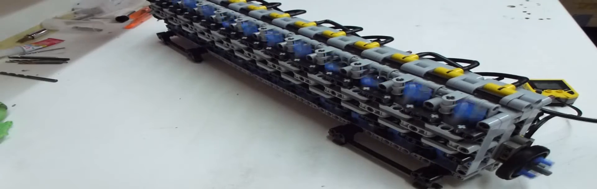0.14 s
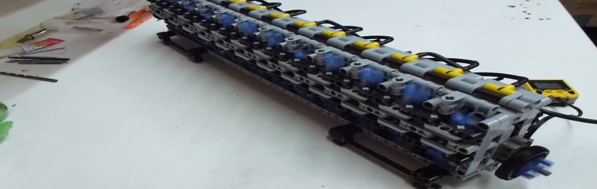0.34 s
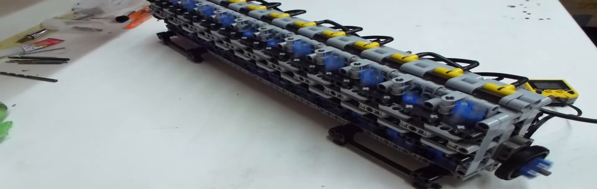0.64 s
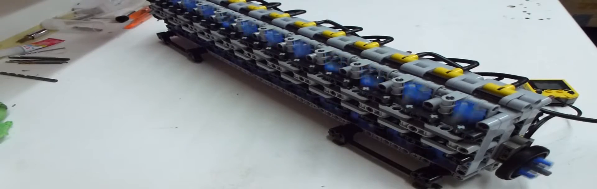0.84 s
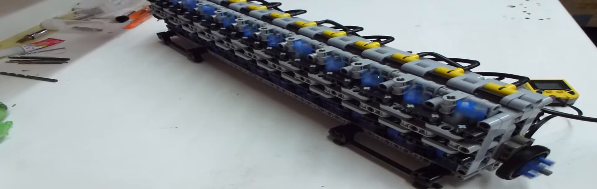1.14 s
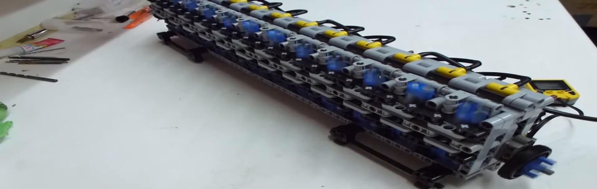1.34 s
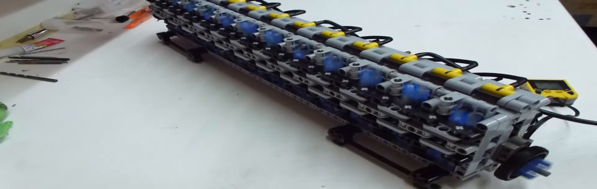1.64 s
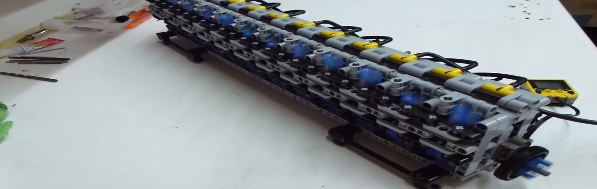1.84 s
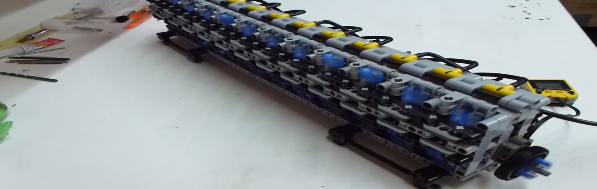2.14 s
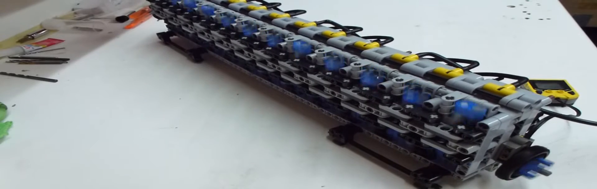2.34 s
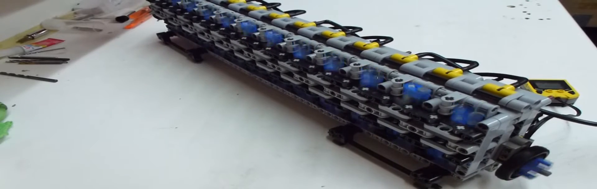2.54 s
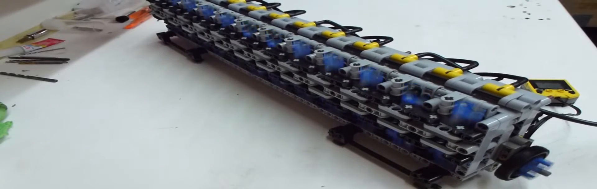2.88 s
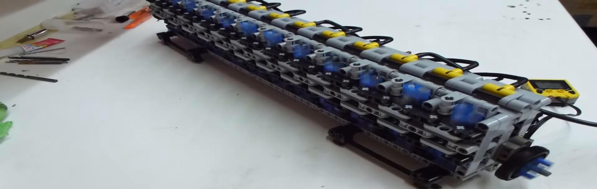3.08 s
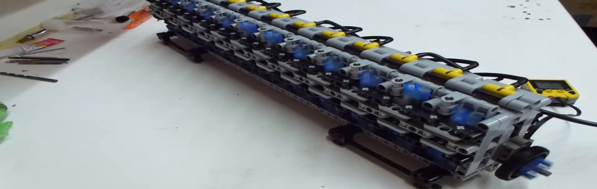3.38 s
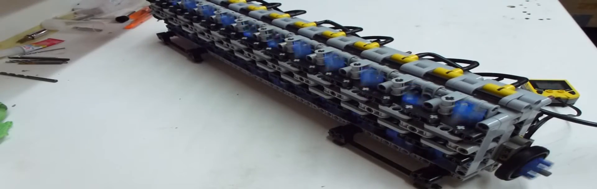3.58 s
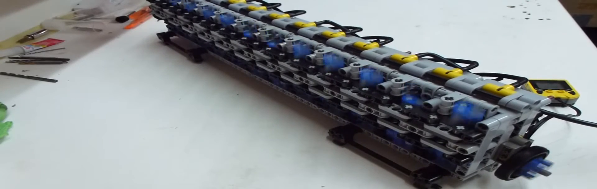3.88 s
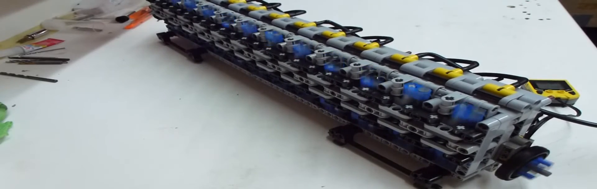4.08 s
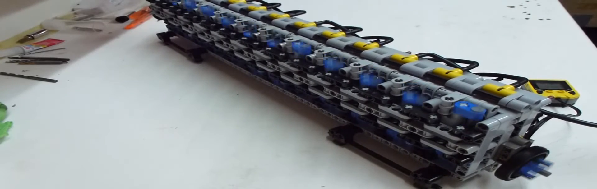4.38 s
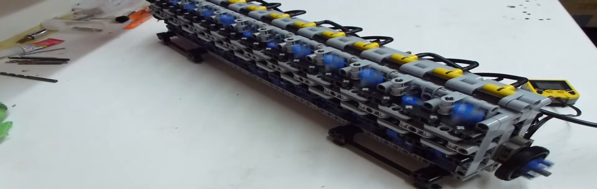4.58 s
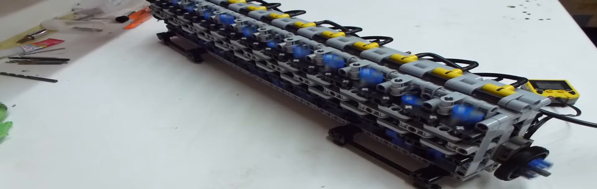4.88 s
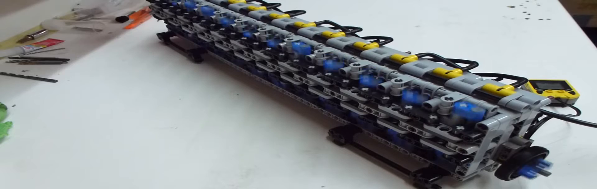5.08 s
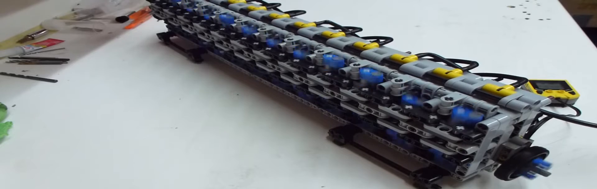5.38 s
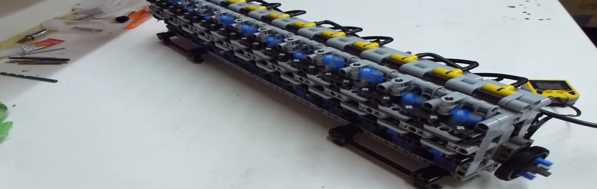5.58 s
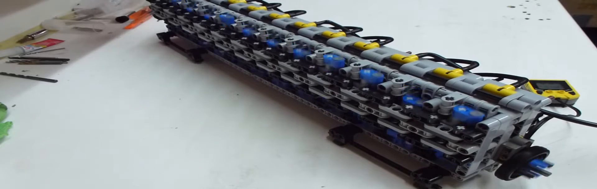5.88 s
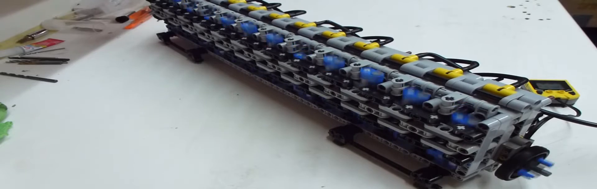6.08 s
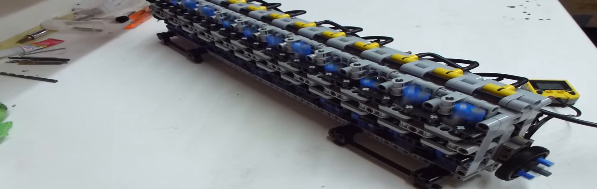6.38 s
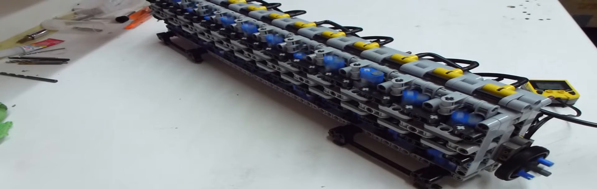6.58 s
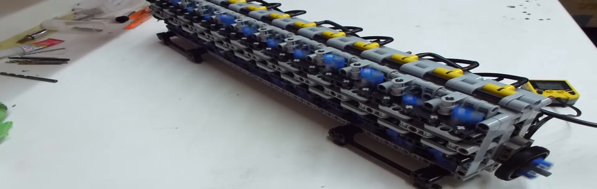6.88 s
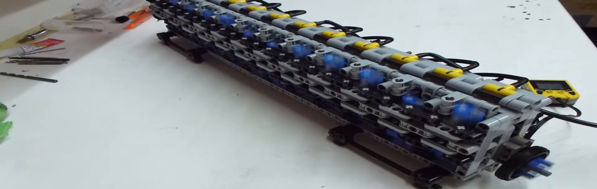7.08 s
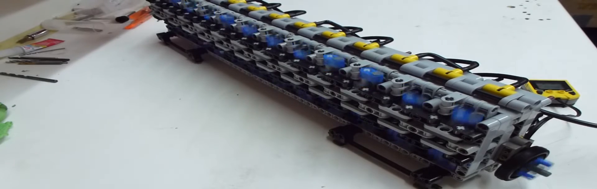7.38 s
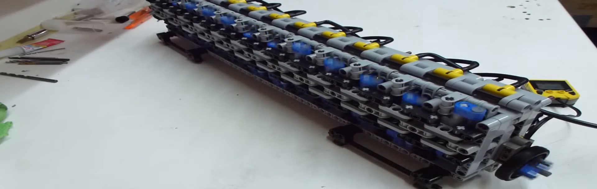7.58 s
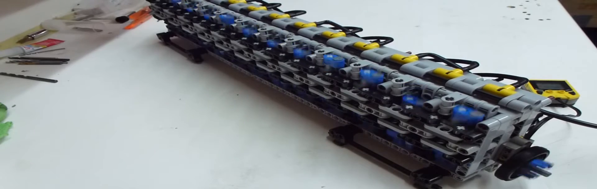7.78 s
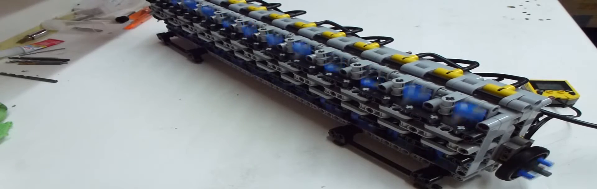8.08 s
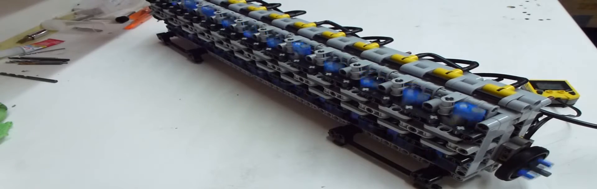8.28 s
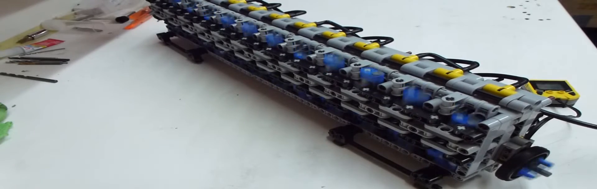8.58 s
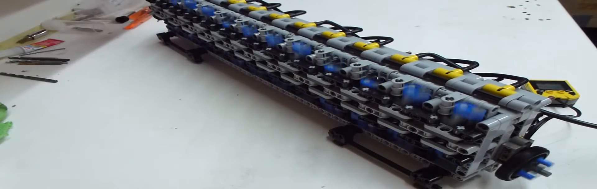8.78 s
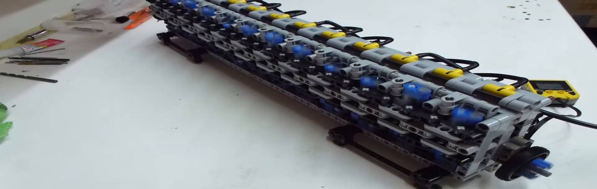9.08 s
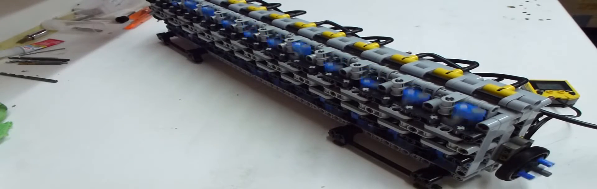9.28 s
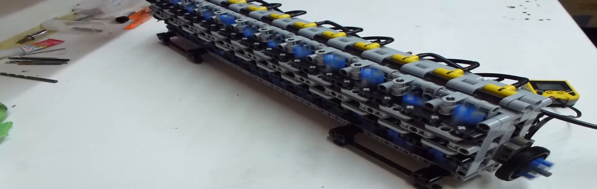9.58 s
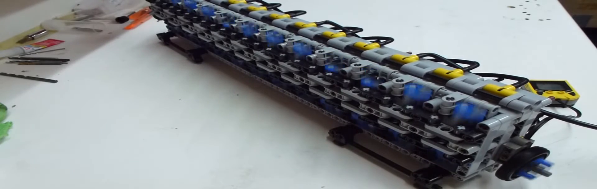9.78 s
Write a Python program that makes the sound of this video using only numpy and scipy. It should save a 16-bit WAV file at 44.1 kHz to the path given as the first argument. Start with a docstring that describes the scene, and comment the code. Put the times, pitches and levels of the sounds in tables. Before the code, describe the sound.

A many-cylinder toy engine of plastic bricks runs on compressed air, with bright hiss, fast rattling and a pulsing buzz. It drops out twice for an instant, then holds an even hum. It slows almost to rest, with separate puffs and clacks, and is then revved in five surges that shake the table. The stereo microphone is close, in a quiet room.

```python
"""Puffing, rattling and a pulsing buzz: a long many-cylinder toy engine of plastic bricks runs on
compressed air, on a table in a quiet room, close to a stereo microphone. It stalls twice briefly,
runs evenly, slows almost to rest and is then revved in surges. Each turn of the crank shakes frame
and table in the same pattern; the valves puff air and loose links rattle. At speed the links pull
tight and the shaking becomes a clean hum. The bass sits in the centre, the hiss spreads wide."""
import sys
import numpy as np
from scipy import signal
from scipy.fft import rfft, irfft, next_fast_len
from scipy.io import wavfile
from scipy.ndimage import uniform_filter1d

SR = 44100
rng = np.random.default_rng(int(sys.argv[2]) if len(sys.argv) > 2 else 0)


def put_to_file(sound):
    """Save the sound as 16-bit audio at rate SR, in the file named by the first command-line argument."""
    columns = np.atleast_2d(sound).T  # one column per channel
    safe = np.clip(columns, -1, 1)
    whole_steps = np.round(safe * 32767)
    wavfile.write(sys.argv[1], SR, whole_steps.astype(np.int16))


N = 438354
T = np.arange(N) / SR

# Colour of plastic parts knocking together. Each row: frequency in Hz, gain in dB.
PLASTIC_COLOUR = [(40, -26), (200, -20), (600, -24), (900, -18), (1200, -14.5), (1800, -13), (2300, -5.7),
                  (3000, -1), (4200, 0.5), (5100, -3), (6400, -2), (9000, -5), (12500, -7), (16000, -22)]


def undb(db):
    """Decibels to gain."""
    return 10 ** (np.asarray(db) / 20)


def unit(x):
    """Scale to rms 1."""
    return x / np.sqrt(np.mean(x ** 2))


def ramp(start_s, length_s):
    """Rises from 0 to 1 over the given time."""
    return np.clip((T - start_s) / length_s, 0, 1)


def since(start_s):
    """Seconds gone by since a moment, 0 before it."""
    return np.maximum(T - start_s, 0)


def band(x, order, hz, kind):
    """The low or high part of a signal, with no phase shift."""
    return signal.sosfiltfilt(signal.butter(order, hz, kind, fs=SR, output="sos"), x)


def colour(x, points):
    """Causal filter with the gain of (Hz, dB) points."""
    size = next_fast_len(2 * N)
    hz, db = np.transpose(points)
    bin_hz = np.maximum(np.arange(size // 2 + 1) * SR / size, 1)
    gain = undb(np.interp(np.log(bin_hz), np.log(hz), db))
    cepstrum = irfft(np.log(gain), size)
    cepstrum[1:size // 2] *= 2  # folded over for minimum phase
    cepstrum[size // 2 + 1:] = 0
    return irfft(rfft(x, size) * np.exp(rfft(cepstrum)), size)[..., :N]


def ring(x, modes):
    """A bank of (Hz, width in Hz, dB) resonances."""
    return sum(undb(db) * signal.lfilter(*signal.iirpeak(hz, hz / width, SR), x)
               for hz, width, db in modes)


def fade(x, seconds):
    """Give every impulse an exponential tail."""
    return signal.lfilter([1], [1, -np.exp(-1 / (seconds * SR))], x)


def impulses(times, sizes):
    """Single-sample blows at the given times; those past the end are dropped."""
    return np.bincount(np.clip(np.asarray(times) * SR, 0, N).astype(int), sizes, N + 1)[:N]


def mid_side(vibration):
    """Side is a quarter cycle behind mid, so left and right hear one vibration out of step."""
    return np.array([vibration, signal.hilbert(vibration, next_fast_len(N))[:N].imag])


def free_play(speed_hz):
    """Play in the links: large at low speed, taken up when the engine runs fast."""
    return np.interp(speed_hz, [8, 12, 16, 17.3], [1.6, 1.05, .6, .02])


def crank_load(turns, dip, swell, peak_turn):
    """Once a turn the load swells smoothly, and lets go briefly at the crank's slack spot."""
    release = 1 - dip * abs(np.cos(np.pi * turns)) ** 18
    return release * (1 + swell * np.cos(2 * np.pi * (turns - peak_turn)))


def strokes(turns, count, pattern_db, scatter_db, slop):
    """So many blows a turn, each with its own angle and strength, straying by slop and scatter."""
    angle, strength = rng.random(count), rng.standard_normal(count)
    late, harder = rng.standard_normal((200, count, 2)).transpose(2, 0, 1)  # enough for 200 turns
    at_turn = np.arange(len(late))[:, None] + (np.arange(count) + angle) / count
    speed_hz = np.interp(at_turn, turns, np.gradient(turns) * SR)
    at_turn = at_turn + slop * late * free_play(speed_hz)
    times = np.interp(at_turn.ravel(), turns, T, left=2 * T[-1], right=2 * T[-1])
    sizes = undb(pattern_db * strength + scatter_db * np.clip(harder, -2, 2))
    return impulses(times, sizes.ravel())


def cycle(turns, orders_db, one_turn, passes):
    """The same shake every turn: like-sized strokes at random angles, clear of the slack spot."""
    crank = np.arange(len(one_turn)) / len(one_turn)
    gains = np.concatenate([[0, 0], undb(orders_db)])  # from twice the crank speed upward
    load = crank_load(crank, dip=.7, swell=.1, peak_turn=.4)
    for _ in range(passes):  # even out the strokes, then restore the spectrum
        evened = np.tanh(2 * unit(one_turn)) * load
        phases = np.angle(rfft(evened)[:len(gains)])
        one_turn = irfft(gains * np.exp(1j * phases), len(crank))
    return np.interp(turns, crank, unit(one_turn) * np.linalg.norm(gains), period=1)


def tick(ring_s, snap, tail_db=-22, tail_s=0.016):
    """One plastic part struck: a snap, a dense short ring and a faint room tail, as mid and side."""
    t = T[:SR // 12]
    envelope = np.exp(-t / ring_s) + undb(tail_db) * np.exp(-t / tail_s)
    sound = rng.standard_normal((2, len(t))) * envelope
    sound[0, 0] += snap
    return sound


def room_tone():
    """The quiet room behind the engine: a faint, steady rumble and hiss."""
    # Each row: frequency in Hz, gain in dB.
    room_colour = [(25, -40), (60, 1), (130, 6), (300, -7), (1000, -14), (5000, -7), (16000, -22)]
    return undb(-56.5) * unit(colour(rng.standard_normal((2, N)), room_colour))


def table_bump(start_s=1.56, length_s=0.018, level_db=-37.5):
    """One soft, scuffing contact rings the table top, one resonance after another."""
    # Each row: resonance in Hz, width in Hz, relative level in dB, lag in seconds.
    table_modes = [(400, 80, -3, 0), (497, 25, 0, 0.022), (775, 35, -4, 0.004)]
    out = 0
    for hz, width, db, lag_s in table_modes:
        mode = unit(ring(rng.standard_normal((2, N)), [(hz, width, 0)]))
        envelope = np.exp(-((T - start_s - lag_s) / length_s - 1) ** 2)
        out = out + undb(level_db + db) * mode * envelope
    return out


def link_clacks(gain_db=4.5):
    """Now and then a link snaps across its play with a sharp clack."""
    # Each row: start in seconds, relative level in dB.
    snaps = [(0.7, -9), (0.7524, -16), (0.9133, -19), (1.9445, -12), (3.556, -12), (5.121, -15),
             (5.234, -14), (5.349, -9), (5.414, -12), (5.996, -17), (6.304, -8), (6.4144, -10),
             (6.8186, -17), (9.7757, -13)]
    out = np.zeros((2, 2 * N))
    for start_s, db in snaps:
        sound, start = tick(ring_s=0.0032, snap=2.4), int(start_s * SR)
        out[:, start:start + sound.shape[1]] += undb(db + gain_db) * sound / abs(sound).max()
    return colour(out[:, :N], PLASTIC_COLOUR)


def rattle(turns, level_db, parts=8):
    """Loose rods and valve levers knock three times a turn, each with a ring of its own."""
    out = 0
    for _ in range(parts):
        blows = strokes(turns, count=3, pattern_db=4.5, scatter_db=0, slop=.012)
        out = out + signal.oaconvolve(blows[None], tick(ring_s=0.013, snap=8.4), axes=1)[:, :N]
    return unit(colour(out, PLASTIC_COLOUR)) * undb(level_db)


def exhaust(turns, speed_hz, level_db, leak_share=0.55, puff_s=0.0039):
    """Valves let out short puffs over a steady leak; near standstill they are heard one by one."""
    # Colour of the escaping air. Each row: frequency in Hz, gain in dB.
    air_colour = [(150, -22.5), (600, -17), (1100, -14.5), (1800, -15), (2300, -14.5), (3100, -7.5),
                  (4200, -3.5), (5100, -5), (6400, -3), (7500, -6), (9000, -6.5), (10500, -9),
                  (12300, -8.5), (14500, -10.5), (16000, -29)]
    # Single valves venting. Each row: start in seconds, relative level in dB, decay in seconds.
    lone_vents = [(5.7716, -27.5, 0.014), (5.8423, -31.5, 0.02), (5.909, -26, 0.004),
                  (5.9448, -26.5, 0.003), (5.9648, -27, 0.008)]
    openings = strokes(turns, count=22, pattern_db=6, scatter_db=4.5, slop=0.0052)
    puffs = fade(openings, puff_s) + 1e-9
    puffs = abs(puffs / uniform_filter1d(puffs, size=SR // 6))
    flow = undb(level_db) * np.sqrt(leak_share + (1 - leak_share) * puffs)
    vents = sum(fade(impulses([s], [undb(db)]), decay_s) for s, db, decay_s in lone_vents)
    air = unit(colour(rng.standard_normal((2, N)), air_colour)) * np.hypot(flow, vents)
    # Fast puffs are thin and bright, slow ones have more body; at a crawl the valve ports ring out.
    octaves = np.log2(speed_hz / 11.5)
    top_change = band(air, 3, 12800, "high") * (undb(3 * octaves) - 1)
    body_change = band(air, 2, 1300, "low") * (undb(-0.5 * octaves) - 1)
    ports = ring(air, [(4300, 550, -10)]) * np.clip(-octaves, 0, 1)
    return air + ports + top_change + body_change


def piston_force(turns, speed_hz, knocks_db=-12, wobble_turns=0.0024, uneven_db=0.5):
    """The pistons push in one pattern each turn; at low speed backlash and stray knocks blur it."""
    size, drift_s = 4096, 0.0087
    orders_db = 3 * rng.standard_normal(140)
    slack = free_play(speed_hz)
    drift = unit(fade(fade(rng.standard_normal(N), drift_s), drift_s))
    backlash = wobble_turns * slack * drift
    force = unit(cycle(turns + backlash, orders_db, rng.standard_normal(size), passes=2))
    lurch = np.interp(4 * turns, np.arange(size), rng.standard_normal(size))  # new each quarter turn
    knocks = 2 * undb(knocks_db) * slack * rng.standard_normal(N)
    return undb(uneven_db * slack * lurch) * (force + knocks)


def shake(force, modes, level_db, band_hz):
    """Crank harmonics slide through resonances as the speed changes, held to the given level."""
    body = signal.sosfilt(signal.butter(5, band_hz, "band", fs=SR, output="sos"), ring(force, modes))
    body = body / np.sqrt(uniform_filter1d(body ** 2, size=SR // 8))
    return mid_side(body) * undb(level_db)


def frame_and_panels(turns, speed_hz, air_db):
    """Shaken by the pistons, the frame booms on the table and the plastic beams and panels buzz."""
    # Each row of both: resonance in Hz, width in Hz, relative level in dB.
    frame_modes = [(76, 17, -7), (113, 7.7, 4), (127.2, 9.4, 22.5), (147, 16, 17.5), (156.3, 6.2, 10)]
    panel_modes = [(284, 15, 3), (324, 40, 3.5), (391, 42, -2), (471, 22, 3), (522, 8.1, 3), (663, 25, -9),
                   (755, 17, -2.5), (950, 51, -19), (1030, 46, -7), (1096, 22, -2), (1326, 58, -9),
                   (1440, 40, -6), (1620, 100, -26), (2030, 490, -7.5)]
    # Each row: crank speed in turns per second, gain of the boom in dB, gain of the buzz in dB.
    speed_response = [(3, -23, -26.5), (5, -20, -28), (6.5, -19, -28), (7.7, -16, -24.5), (9, -16, -24.5),
                      (11, -23, -20.5), (14, -22.5, -20), (17.3, -23.5, -17)]
    at_hz, *gains_db = np.transpose(speed_response)
    boom_db, buzz_db = (air_db + np.interp(speed_hz, at_hz, db) for db in gains_db)
    force = piston_force(turns, speed_hz)
    boom = shake(force, frame_modes, boom_db - 1.2, band_hz=[51, 172])
    buzz = shake(force, panel_modes, buzz_db + 2, band_hz=[225, 2480])
    return boom + buzz * crank_load(turns, dip=.2, swell=.25, peak_turn=.5)


def hum(turns, speed_hz, level_db, eased_hz=17.65, full_hz=18.05):
    """With the links tight every turn is alike: a clean, pulsing buzz that shifts as the crank eases."""
    # At full speed. Each row: multiple of the crank speed, relative level in dB.
    harmonics = [(2, -75), (3, -71), (4, -63), (5, -60), (6, -51), (7, -60), (8, -57), (9, -62), (10, -68),
                 (11, -76), (12, -58), (13, -62), (14, -57), (15, -51), (16, -53), (17, -55), (18, -52),
                 (19, -66), (20, -61), (21, -54), (22, -73), (23, -54), (24, -64), (25, -60), (26, -51),
                 (27, -51), (28, -53), (29, -56), (30, -55), (31, -63), (32, -66), (33, -79), (34, -72),
                 (35, -57), (36, -58), (37, -57), (38, -79), (39, -74), (40, -60), (41, -61), (42, -69),
                 (43, -64), (44, -63), (45, -66), (46, -66), (47, -67), (48, -69), (49, -65), (50, -68),
                 (51, -67), (52, -64), (53, -70), (54, -61), (55, -64), (56, -60), (57, -66), (58, -66),
                 (59, -70), (60, -59), (61, -65), (62, -56), (63, -62), (64, -63), (65, -65), (66, -69),
                 (67, -61), (68, -65), (69, -65), (70, -68), (71, -63), (72, -57), (73, -59), (74, -58),
                 (75, -61), (76, -63), (77, -63), (78, -67), (79, -64), (80, -58), (81, -68), (82, -63),
                 (83, -70), (84, -68), (85, -64), (86, -63), (87, -67), (88, -61), (89, -70), (90, -66)]
    # With the crank eased off a little. Each row: multiple of the crank speed, change in dB.
    eased_changes = [(4, 1), (6, -2), (8, 2), (12, 0), (15, -5), (18, -3), (20, 3), (23, -3), (26, 0),
                     (28, -5), (32, 4), (34, 8), (35, -6), (37, -5), (38, 11), (39, 9), (40, -2), (44, 0),
                     (58, 0), (61, 3), (64, 0), (68, 1), (73, -6), (78, -1), (84, 4), (90, 0)]
    multiple, full_db = np.transpose(harmonics)
    eased_db = full_db + np.interp(multiple, *np.transpose(eased_changes))
    one_turn = rng.standard_normal(4096)
    full, eased = (cycle(turns, db, one_turn, passes=12) for db in (full_db, eased_db))
    share = np.interp(speed_hz, [eased_hz, full_hz], [0, 1])
    return undb(level_db) * mid_side(share * full + (1 - share) * eased)


def air_drive():
    """Crank speed (Hz) and air level (dB): air spins the crank up, friction slows it as air leaks away."""
    # With the air left on. Each row: time in seconds, crank speed in turns per second.
    cruise = [(0.75, 18.45), (0.92, 18.58), (3.02, 18.05), (3.17, 17.7), (3.3, 17.56), (3.63, 17.48),
              (3.72, 17.23), (3.8, 16.6), (3.91, 15.56), (4.02, 14.35), (4.3, 11.76), (4.5, 11.28),
              (4.91, 8.91), (5.35, 8.53)]
    # The supply meanwhile. Each row: time in seconds, air level in dB.
    supply = [(0.75, -24.5), (1.9, -25.5), (3.75, -25), (4.05, -27), (5.35, -26)]
    # Brief cuts of the air. Each row: cut in seconds, return in seconds, burst on return in dB.
    stalls = [(0.006, 0.224, 1.5), (0.484, 0.61, 1.5)]
    # Revs. Each row: start, pressure rise, hold and spin-up in seconds, top speed in turns per second.
    surges = [(5.87, 0.39, 0.0096, 0.605, 8.49), (6.67, 0.37, 0.14, 0.635, 11.02),
              (7.758, 0.31, 0.07, 0.48, 10.56), (8.39, 0.24, 0.095, 0.367, 11.69),
              (9.211, 0.38, 0.18, 0.847, 13.94)]
    stall_s, restart_s, burst_s = 0.225, 0.032, 0.099
    surge_db, leak_db_per_s = -22, 7.5
    friction_hz_per_s, coast_onset_s = 11.8, 0.1
    running = 1 - ramp(start_s=5.38, length_s=0.75)  # the supply is shut and the engine runs down
    speed_hz = np.interp(T, *np.transpose(cruise)) * running
    air = undb(np.interp(T, *np.transpose(supply))) * running ** 1.12
    for cut_s, back_s, burst_db in stalls:
        share = np.maximum(1 - ramp(cut_s, stall_s), ramp(back_s, restart_s))
        burst = undb(burst_db * (T > back_s) * np.exp(-(since(back_s) / burst_s) ** 2))
        speed_hz, air = speed_hz * share, air * share ** 1.96 * burst
    for opens_s, rise_s, hold_s, spin_up_s, top_hz in surges:
        leaked_db = leak_db_per_s * since(opens_s + rise_s + hold_s)
        pressure = ramp(opens_s, rise_s) * undb(surge_db - leaked_db)
        coasting_s = np.hypot(since(opens_s + spin_up_s), coast_onset_s) - coast_onset_s
        revs_hz = top_hz * np.sin(np.pi / 2 * ramp(opens_s, spin_up_s)) - friction_hz_per_s * coasting_s
        speed_hz, air = np.maximum(speed_hz, revs_hz), np.maximum(air, pressure)
    return np.maximum(speed_hz, 1), 20 * np.log10(air + 1e-4)


def scene():
    """Engine and room at the close microphone, mixed as mid and side and returned as left and right."""
    # Stereo width. Each row: frequency in Hz, gain of the side signal in dB.
    stereo_width = [(60, -8), (110, -24), (200, -17.5), (380, -19.5), (700, -15.5), (1290, -14),
                    (2380, -17), (4400, -6.5), (8120, -4.5), (15000, -0.5)]
    creep_hz, slack_hz, tight_hz, slack_spot_s = 3.6, 15.5, 17.25, 2.0311
    speed_hz, air_db = air_drive()
    turns = np.cumsum(speed_hz) / SR
    turns += -np.interp(slack_spot_s, T, turns) % 1  # the slack spot falls on whole turns
    # Fast running takes up the play: the shaking gives way to the hum, and the low hiss drops.
    tight = np.interp(speed_hz, [slack_hz, tight_hz], [0, 1])
    body = np.sqrt(1 - tight) * frame_and_panels(turns, speed_hz, air_db)
    body += np.sqrt(tight) * hum(turns, speed_hz, air_db + 24.7)
    venting = np.minimum(speed_hz / creep_hz, 1)  # at a creep most valves stay shut
    hiss = undb(-1.5) * exhaust(turns, speed_hz, air_db + 20 * np.log10(venting))
    hiss += venting * rattle(turns, air_db - 5.5)
    hiss += band(hiss, 2, 1750, "low") * (undb(-5.5 * tight) - 1)
    mid, side = room_tone() + link_clacks() + table_bump() + hiss + body
    side = colour(side, stereo_width)
    return np.array([mid + side, mid - side])


def record(dry):
    """The recorder cuts the top steeply above 16.1 kHz."""
    return signal.sosfilt(signal.ellip(10, .2, 80, 16100, fs=SR, output="sos"), dry)


dry = scene()
out = record(dry)
put_to_file(out)
```